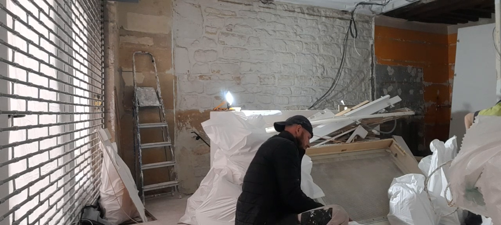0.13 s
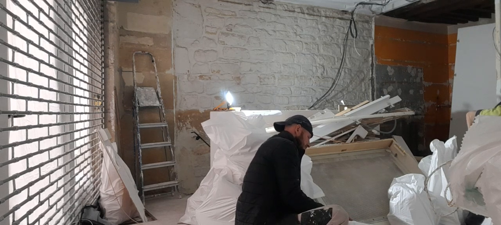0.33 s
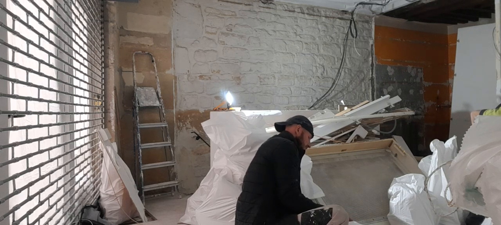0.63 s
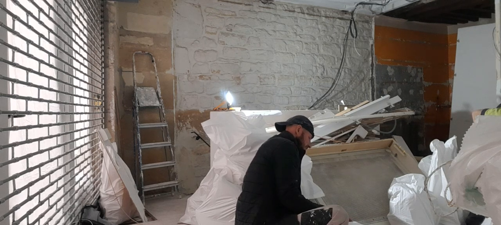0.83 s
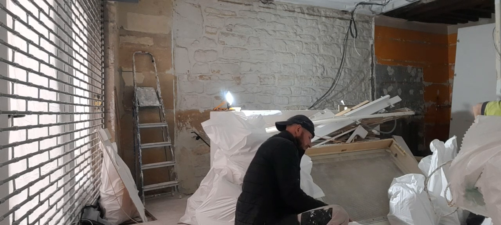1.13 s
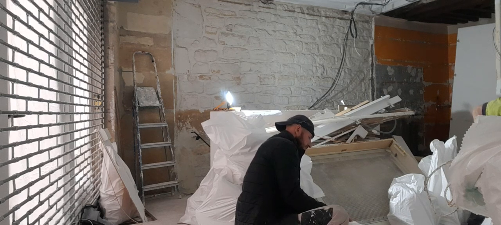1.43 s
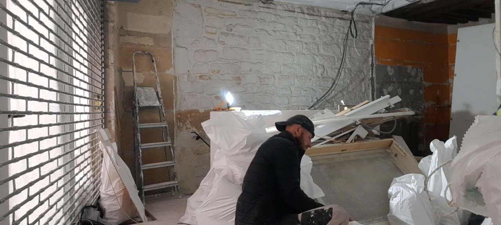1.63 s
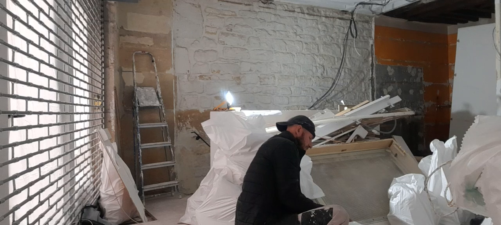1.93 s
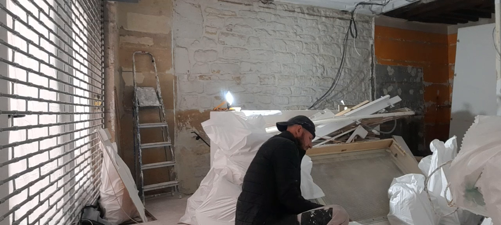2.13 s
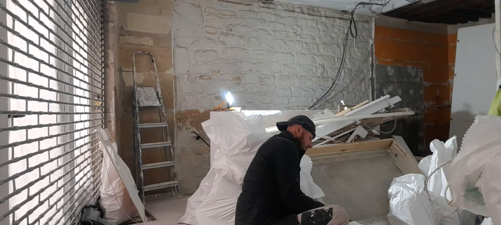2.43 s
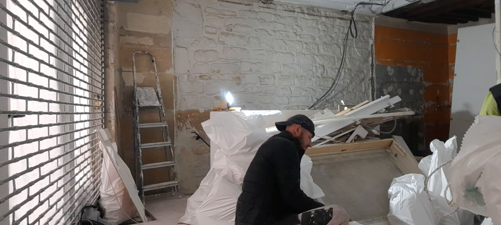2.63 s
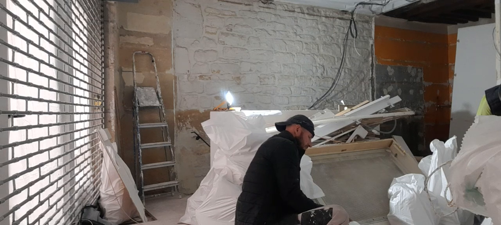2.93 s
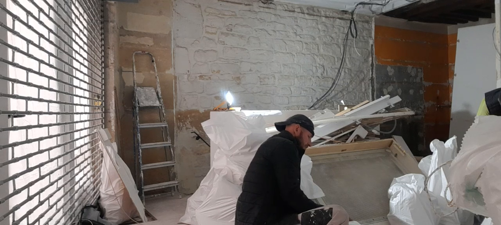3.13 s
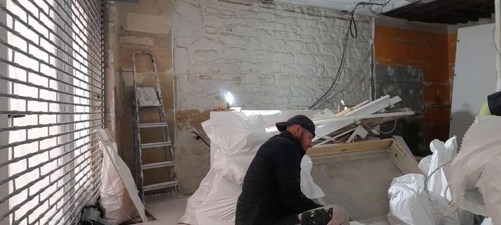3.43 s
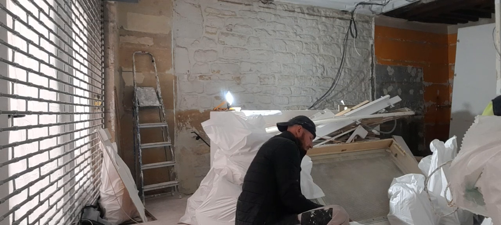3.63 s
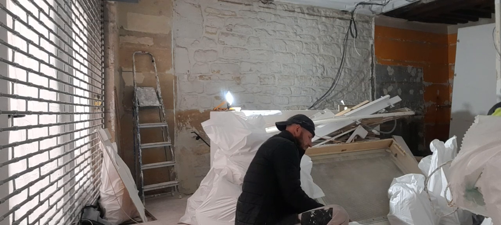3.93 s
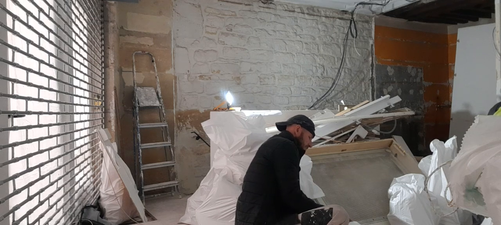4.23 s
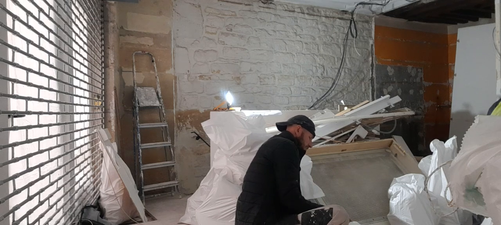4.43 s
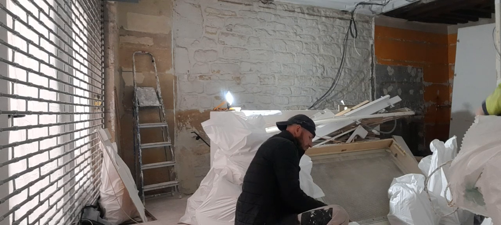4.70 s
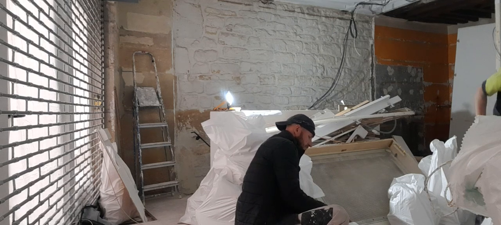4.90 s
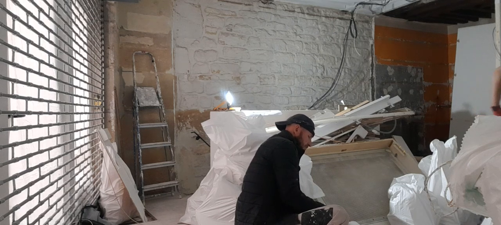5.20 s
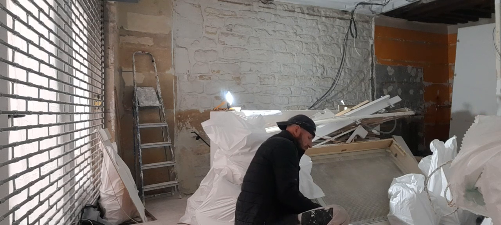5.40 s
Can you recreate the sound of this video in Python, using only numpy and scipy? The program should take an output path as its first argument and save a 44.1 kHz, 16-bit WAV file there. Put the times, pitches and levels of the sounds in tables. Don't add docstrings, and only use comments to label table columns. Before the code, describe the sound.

A bare old room with a quiet, low background and short, hard reverberation. At once a heavy load of broken brick lands, dull and loud, with overlapping thuds, sliding grit and a rapid clatter of small bright bits until about 0.3 s. A chip clicks at 0.4 s, and a tile-like shard lands with a bright clink and thud at 0.7 s. From 0.9 to 3.2 s it is much quieter: short gritty scrapes, crackling woven plastic, faint dust hiss, separate chip clicks, and a soft boomy bump near 2.2 s. Sharper clicks come around 3.05 and 3.14 s, then a hollow block drops at 3.35 s with a strong knock and brief ring. Soft scrapes, rustles and low bumps continue through 4.9 s. At 5.07 s four very quick blows strike a steel blade, with a thud and bright clang ringing towards the end at about 5.5 s. The close stereo microphone hears more treble on the right.

```python
import sys
import numpy as np
from scipy import signal
from scipy.fft import rfft, irfft, next_fast_len
from scipy.io import wavfile

SR = 44100
rng = np.random.default_rng(int(sys.argv[2]) if len(sys.argv) > 2 else 0)


def dump_mix(stems):
    frames = np.atleast_2d(stems).T
    limited = np.clip(frames, -1, 1)
    pcm = np.round(limited * 32767).astype(np.int16)
    wavfile.write(sys.argv[1], SR, pcm)


def invert_db(level):
    return 10 ** (np.asarray(level, dtype=float) / 20)


N = 245195


def unit(x):
    return x / np.sqrt(np.mean(np.mean(x, axis=0) ** 2) + 1e-20)


def along(points, hz):
    f, v = np.transpose(points)
    return np.interp(np.log(hz + 1), np.log(f + 1), v)


def filtered(x, response):
    m = next_fast_len(x.shape[-1] + 8192)
    spectrum = rfft(x, m) * response(np.fft.rfftfreq(m, 1 / SR))
    return irfft(spectrum, m)[..., :x.shape[-1]]


def add(out, s, x):
    k = round(s * SR)
    out[:, k:k + x.shape[1]] += x[:, :N - k]
    return out


# (frequency [Hz], correlation [-1 to 1])
ALIKE = [(30, 0.8), (60, 0.8), (130, 0.98), (290, 0.71), (640, 0.12), (1410, -0.13), (3100, 0.017),
         (6820, 0.012), (15000, 0.039)]


def two_ports(pair):
    def turn(hz):
        return np.arccos(np.clip(along(ALIKE, hz), -1, 1)) / 2
    mid, side = filtered(pair, lambda hz: np.array([np.cos(turn(hz)), np.sin(turn(hz))]))
    return np.array([mid + side, mid - side])


# (frequency [Hz], left minus right [dB])
PORTS = [(60, -4), (95, -4.5), (150, 0), (240, 0.5), (380, -4.5), (600, -3), (950, -5), (1500, -6.5),
         (2380, -6.5), (3770, -6), (5980, -13), (9470, 1.5), (15000, -6)]


def port_gain_db(hz):
    return along(PORTS, hz) * np.array([[.5], [-.5]])


def ports(x):
    return filtered(x, lambda hz: invert_db(port_gain_db(hz)))


# (frequency [Hz], t60 [s])
ROOM = [(100, 0.43), (500, 1), (2000, 0.62), (6000, 0.44), (12000, 0.15)]


def walls(x, shorten, onset_s):
    size = min(SR, round(shorten * 4 + 1) * SR // 4)
    hz, t, z = signal.stft(rng.standard_normal((2, size)), SR, nperseg=256)
    decay = invert_db(-60 * t / (shorten * along(ROOM, hz)[:, None]))
    tail = signal.istft(z * decay, SR, nperseg=256)[1][:, :size]
    tail = two_ports(tail * (1 - np.exp(-np.arange(size) / SR / onset_s)))
    return signal.fftconvolve(x[None], tail / np.linalg.norm(tail[0]), axes=1)[:, :len(x)]


def grains(colour, rate, spread_db, blur_s):
    contacts = (rng.random(N) < rate / SR) * invert_db(2 * spread_db * rng.exponential(size=N))
    energy = signal.lfilter([1], [1, -np.exp(-2 / (blur_s * SR))], contacts)
    pair = two_ports(np.sqrt(energy) * rng.standard_normal((2, N)))
    return unit(filtered(pair, lambda hz: invert_db(along(colour, hz) + port_gain_db(hz))))


def swells(rows, lift, quicker=1):
    s, db, swell_s, settle_s, *over_db = np.transpose(rows)[:, :, None]
    since = (np.arange(0, N + 32, 32) / SR - s) / quicker
    level_db = db + lift * sum(over_db) - 20 * np.maximum(-since / swell_s, since / settle_s)
    gain = np.sqrt(np.sum(invert_db(2 * level_db), axis=0))
    return np.interp(np.arange(N) / 32, np.arange(since.shape[1]), gain)


def follows(gain, level_db, grows):
    return invert_db(level_db) * (gain / invert_db(-60)) ** grows


def dipping(depth_db, recover_s):
    blows_s = np.array([[DROPS[1][0]], [DROPS[2][0]], [STRIKES[0][0]]])
    since = np.arange(N) / SR - blows_s
    dip_db = depth_db * (since > -.005) * np.exp(-(since / recover_s) ** 2)
    return invert_db(-np.sum(dip_db, axis=0))


def rattle(rise_s, t60):
    t = np.arange(SR) / SR
    return (1 - np.exp(-t / rise_s)) * invert_db(-60 * t / t60) * rng.standard_normal(SR)


def resonances(x, peaks, order=1):
    def response(f):
        total = 0
        for k, (c, w, db) in enumerate(peaks):
            peak = 1j * f * w / (c * c - f * f + 1j * f * w)
            total = total + (-1) ** k * invert_db(db) * peak ** order
        return total
    return filtered(x, response)


def ringing(modes, rise_s, behind):
    t = np.arange(SR // 2) / SR
    lag = np.array([[behind], [0]])
    ring = sum(invert_db(db - 60 * t / t60) * np.sin(2 * np.pi * (hz * t - lag)) for hz, db, t60 in modes)
    return ring * (1 - np.exp(-t / rise_s))


# (frequency [Hz], level [dB])
STILL = [(24, -45), (64, -5.5), (110, -17.5), (450, -16.5), (700, -29), (1200, -35), (2000, -24),
         (6200, -33.5), (8000, -36.5), (13000, -28), (15800, -27)]


def stillness():
    return invert_db(-67.5) * grains(STILL, rate=5500, spread_db=-1.5, blur_s=.03)


# (time [s], thud [dB], swell [s per 20 dB], settle [s per 20 dB], floor boom over thud [dB])
LOADS = [(0.0, -30, .02, .05, -17), (.066, -27, .03, .12, -8), (.14, -36, .08, .23, -.3),
         (.21, -34.5, .09, .07, -6), (.66, -64, .1, .04, -9), (.714, -37.5, .016, .15, -11),
         (.77, -33, .06, .14, -5), (1.41, -54, .06, .21, -16), (3.95, -64, .15, .21, -15),
         (1.85, -58, .06, .45, -5), (2.158, -46.5, .02, .24, .6), (2.55, -67, .21, .15, -3),
         (2.83, -60, .21, .21, -.3), (3.07, -64, .06, .4, -.3), (3.24, -61, .3, .15, -1.5),
         (3.375, -33, .03, .18, -7), (3.5, -49, .15, .24, 3), (4.16, -49.5, .14, .12, .3),
         (4.31, -55, .05, .15, -4), (4.52, -46, .06, .1, -.3), (4.69, -62, .15, .15, 4),
         (5.075, -39, .1, .21, -9), (5.14, -40, .1, .21, -6), (5.39, -58, .15, .21, -3)]
# (frequency [Hz], level [dB])
BOOM = [(53, -27), (90, -14), (151, 5), (194, -9.5), (230, 2), (300, -22.5), (510, -120)]
THUD = [(110, -57), (190, -7.5), (379, -3), (416, -2), (587, -3.5), (700, -11.5), (850, -13.5), (1100, -18),
        (1870, -120)]
# (frequency [Hz], width [Hz], level [dB])
FLOOR = [(233, 38, -14), (305, 75, 6), (348, 25, 2), (404.7, 7.3, -2), (469, 7.3, -3.5), (587, 20, -1.5)]


def heavy_loads():
    linger_db, linger_s = -25, .4
    tails = [(s, db + linger_db, swell_s, linger_s, over) for s, db, swell_s, settle_s, over in LOADS]
    loads = LOADS + tails

    def boards(f):
        return 1 + sum(invert_db(db - 8.5) / (1 + ((f - hz) / width * 2) ** 2) for hz, width, db in FLOOR)

    boom = swells(loads, 1) * grains(BOOM, rate=90, spread_db=2.5, blur_s=0.024)
    thud = unit(filtered(grains(THUD, rate=300, spread_db=1.72, blur_s=0.036), boards))
    return boom + swells(loads, 0) * dipping(5.3, 0.042) * thud


# (time [s], grit [dB], swell [s per 20 dB], settle [s per 20 dB],
# weave over grit [dB]) scrapes of the scooping and rustles of the sack
SCRAPES = [(0.012, -33, .08, .045, -6), (.088, -34, .05, .21, -8.5), (.39, -57, .15, .21, -1.5),
           (.67, -63, .3, .05, 3), (.858, -53, .1, .07, -1.5), (.942, -60, .05, .19, .3),
           (1.422, -49.5, .11, .16, -3), (1.606, -57, .011, .15, 4), (1.88, -61, .35, .9, 5),
           (2.238, -55, .6, .16, -6), (2.42, -66, .05, .21, -6), (2.66, -69, .05, .21, 8),
           (2.808, -64, .4, .35, 4), (3.042, -54, .03, .33, -4), (3.282, -55.5, .14, .12, 3),
           (3.5, -58, .3, .3, 4), (3.638, -53, .3, .21, -5), (4.068, -61, .12, .3, 3),
           (4.29, -53, .03, .3, -4), (4.488, -54, .04, .21, -7), (4.808, -66, .4, .35, 5),
           (4.996, -62, .15, .3, 4), (5.35, -57, .45, .45, -1.5),
           (1.28, -72, .05, .11, 7), (3.91, -78, .21, .25, 11), (4.178, -69, .11, .15, 8),
           (4.68, -61, .09, .15, -.3)]
SPRAYS = [
    (.716, -38, .021, .21, -7),
    (3.355, -44, .008, .11, 3),
    (.18, -39, .3, .13, -6),
    (5.081, -36, .015, .12, 11),
]
# (frequency [Hz], level [dB])
GRIT = [(410, 0), (700, -1.5), (752, -0.5), (1050, -8.5), (1470, -2), (1770, -4.5), (1940, -2.5),
        (3300, -15.5), (4290, -22), (7260, -120)]
WEAVE = [(1530, -10), (2600, -2), (2810, -4), (4080, -4.5), (6210, -3), (6640, -1.5), (7590, -37),
         (8200, -20.5), (10700, -17), (18000, -120)]
DUST = [(4240, -8), (7200, -4), (8080, -11.5), (11900, -0.5), (15100, -4), (15800, -25)]


def sliding_grit():
    slides = SCRAPES + SPRAYS
    dusty = slides[:-2]
    grit = swells(slides, 0) * grains(GRIT, rate=400, spread_db=1.5, blur_s=0.033)
    rustle = grains(WEAVE, rate=830, spread_db=2.0, blur_s=0.018)
    sheen = filtered(rustle, lambda hz: hz > 7800)
    weave = swells(slides, 1) * (rustle - sheen) + swells(dusty, 1) * sheen
    stir = swells(dusty, 1, quicker=.82)
    stir = stir / np.hypot(1, stir / invert_db(-53))
    dust = follows(stir, level_db=-61.5, grows=1.1) * dipping(np.array([[3], [0], [11]]), .13)
    dust = dust * grains(DUST, rate=1300, spread_db=2.0, blur_s=0.014)
    return (grit + weave + dust) * dipping(np.array([[7], [4], [7]]), .1)


# (time [s], peak [dB], time to settle [s], first slam [dB])
DROPS = [
    (0.054, -22, 0.39, 25),
    (0.701, -26, 0.14, 10),
    (3.349, -24, 0.0636, 20),
    (.075, -31, .5, 10),
]
# (frequency [Hz], width [Hz], level [dB])
LUMPS = [
    [(420, 84, 5.5), (1550, 74, -6), (2080, 180, -9), (2780, 220, -7.5)],
    [(576, 100, 4.5), (1450, 180, 2), (1900, 120, -1), (2430, 130, -6), (3530, 250, -10), (4640, 200, -12),
     (5900, 250, -12), (6280, 200, -10), (9000, 220, -20), (9530, 200, -18), (11500, 190, -21),
     (12100, 410, -24), (14700, 1200, -18)],
    [(300, 80, 0), (440, 90, 2), (581, 59, -6.5), (790, 21, -5), (1105, 15, -10), (1250, 30, -2.5),
     (1607, 45, -14), (1990, 30, -4.5), (2206, 60, -18), (2790, 52, -22)],
    [(4700, 400, 0), (5250, 350, -1), (6600, 300, -5)],
]
# (time [s], level [dB], rise [s], left port behind [cycles])
CLINKS = [
    (.701, -41, .008, .2),
    (3.3505, -24.5, .002, .08),
    (3.326, -42, .003, .08),
    (.053, -29, .004, .05),
]
# (frequency [Hz], level [dB], t60 [s])
CLINK_MODES = [
    [(1447, 5, .12), (2439, -3, .2), (3531, -3, .18), (4635, -5, .16), (5868, -12, .2), (6240, 0, .22),
     (7472, -17, .2), (9545, -7, .11), (11500, -11, .1), (14170, -14, .15), (14800, -11, .12)],
    [(409, 0, .41), (474, -2, .55), (576, -13, .8), (770, -19, .32), (1105, -20, .25), (1233, -10, .2),
     (1981, -17, .23), (2089, -28, .3), (2762, -24, .16), (4334, -32, .2), (4750, -32, .2),
     (5766, -32, .15)],
    [(580, 0, .15)],
    [(390, 0, .12), (560, -5, .1)],
]


def bricks():
    out = np.zeros((2, N))
    for (s, db, settle_s, slam_db), peaks in zip(DROPS, LUMPS):
        landing = invert_db(slam_db) * (np.arange(SR) == SR // 441)
        x = resonances(landing + rattle(rise_s=0.0045, t60=settle_s), peaks)
        x = x / np.abs(x).max()
        add(out, s - .003, invert_db(db - 5.5) * (x + invert_db(6) * walls(x, shorten=0.54, onset_s=0.0053)))
    for (s, db, rise_s, behind), modes in zip(CLINKS, CLINK_MODES):
        add(out, s, invert_db(db) * ringing(modes, rise_s, behind))
    return out


# (time [s], peak [dB], chip pitch [Hz], low knock [dB], bright edge [dB])
CHIPS = [(0.056, -27, 2840, -11, -38), (.0733, -28, 5000, -15, -20), (.092, -27, 4800, -12, -25),
         (.0995, -28, 5200, -15, -25), (.1251, -25, 5200, -18, -25), (.138, -31, 4600, -15, -25),
         (.152, -33, 4900, -15, -25), (.17, -33, 2200, -8, -25), (0.3765, -32, 1980, -8.5, -22),
         (0.6526, -38.5, 3820, -13, -9), (0.696, -41, 900, 8, -30), (0.9378, -45, 4050, -17, -21),
         (1.2133, -37, 2820, -19, -30), (1.3747, -39, 964, -6, -15), (1.5982, -42, 6000, -3, 1),
         (1.736, -41, 4660, -33, -11), (1.8342, -36, 2790, -9, -24), (2.1625, -41, 1680, -6, -20),
         (2.4077, -47, 1900, -0.5, -31), (2.7692, -39, 1540, -13, -19), (2.811, -38, 1520, -1.5, -28),
         (3.016, -44, 1890, -7, -9), (3.045, -33, 972, -7, -15), (3.1394, -30.5, 1080, -17.5, -16.5),
         (3.275, -41, 2060, -13, -15), (3.326, -44, 560, 0, -25), (3.347, -40, 700, 6, -30),
         (3.3535, -38, 4500, -12, -15), (3.8157, -52, 2000, -10, -0.5), (4.0112, -49, 3730, -16, -5),
         (4.0642, -41, 2100, -16, -7), (4.2637, -38, 1390, -4, -23), (4.482, -42, 1200, -4, -20),
         (4.9791, -42, 964, -7, -10)]
# (frequency [Hz], level [dB])
SNAP = [(410, -23), (700, -1), (1330, -4), (2130, 3), (3910, -6), (4450, 0), (7920, -16.5), (9000, -18),
        (11700, -54), (19800, -120)]


def chips():
    out = np.zeros((2, N))
    for s, db, hz, knock_db, edge_db in CHIPS:
        def body(f):
            knock = np.interp(f, [2200, 3000], [knock_db + 9.5, 0])
            ring = 1 + 2.2 / (1 + ((f / hz - 1) / 0.16) ** 2)
            return invert_db(along(SNAP, f) + knock) * ring

        click = rattle(rise_s=0.0007, t60=0.009)[:SR // 3]
        edge = filtered(click, lambda f: invert_db(along(DUST, f) + edge_db + 10.5))
        x = filtered(click, body) + edge
        add(out, s, invert_db(db - 3.5) * (x + invert_db(-1) * walls(x, shorten=0.22, onset_s=0.0027)))
    return out


# (time [s], rumble [dB], swell [s per 20 dB], settle [s per 20 dB])
JOLTS = [(.25, -59, .3, .6), (.64, -60, .21, .11), (.77, -53, .11, .3), (1.41, -66, .11, .15),
         (1.65, -63, .11, .3), (2.19, -54, .09, .6), (2.35, -56, .3, .06), (2.57, -65, .11, .11),
         (2.83, -62, .3, .15), (3.22, -60, .25, .12), (3.39, -48, .06, .4), (4.21, -63, .25, .4),
         (4.56, -55, .09, .08), (4.7, -64, .15, .11), (5.14, -60, .3, .6)]
# (frequency [Hz], level [dB])
RUMBLE = [(15, -45), (25, -35), (55, -6.5), (105, -9), (140, -34), (230, -120)]


def jolts():
    return swells(JOLTS, 0) * grains(RUMBLE, rate=200, spread_db=0.0, blur_s=0.026)


# (time [s], level [dB])
STRIKES = [
    (5.068, -28),
    (5.077, -30),
    (5.084, -25),
    (5.103, -24),
]
# (frequency [Hz], level [dB])
CRACK = [(530, -46), (900, -23), (1620, -34), (2430, 13), (3090, -15), (3930, 7), (4280, -13), (4760, -12),
         (6270, 7), (8170, -32), (8880, -20), (11000, -29), (15800, -23.5)]
# (blow [dB], its t60 [s], later swell [dB], swell half-width [s])
RINGS = [(-45, .88, -39.5, .07), (-43, .11, -43, .03), (-38, .47, -47, .06), (-42, .42, -45, .045)]
# (frequency [Hz], ..)
PARTIALS = [(2743,), (3706,), (4809, 4851), (6099,)]
# (frequency [Hz], level [dB], t60 [s])
WEAK = [(1900, -20, .2), (2538, -13, .45), (3311, -17, .25), (3906, -13, .15), (5459, -19, .3)]
# (frequency [Hz], width [Hz], level [dB])
OVERTONES = [(6440, 150, -2), (7450, 200, -5), (8380, 70, -10), (9080, 130, -6), (9800, 70, -16),
             (10500, 120, -6), (11580, 100, -10), (12130, 70, -14), (12600, 80, -14), (12790, 80, -15),
             (13750, 300, -12), (14400, 600, -9), (15450, 300, -12)]
# (frequency [Hz], level [dB], t60 [s])
SHIMMER = [(6880, -28, .5), (7381, -19, .5), (7493, -21, .4), (7779, -27, .4), (8387, -26, .31),
           (9135, -17, .28), (9469, -25, .25), (10540, -17, .33), (11630, -24, .4), (12130, -29, .4),
           (12600, -31, .35), (12790, -30, .35), (13780, -26, .2), (15585, -25, .26)]


def blade():
    t = np.arange(SR // 2) / SR
    first_s, second_s = STRIKES[0][0], STRIKES[1][0]
    long = 0
    for (blow_db, t60, swell_db, width_s), pitches in zip(RINGS, PARTIALS):
        swell = invert_db(swell_db - 6 * ((t - .095) / width_s) ** 2)
        gain = np.hypot(invert_db(blow_db - 60 * t / t60), swell) * (1 - np.exp(-t / .012))
        for hz, share in zip(pitches, [.9, .55]):
            tone = np.sin(2 * np.pi * (hz * t + np.array([[0], [.2]])))
            long = long + gain * invert_db(6.5) * share * tone
    ring = add(np.zeros((2, N)), first_s, long)

    short = 0
    for hz, level, t60 in WEAK:
        short = short + invert_db(level - 60 * t / t60) * np.sin(2 * np.pi * (hz * t + rng.random((2, 1))))
    add(ring, first_s, invert_db(-28) * short * (1 - np.exp(-t / 0.007)))

    clang = [resonances(rattle(rise_s=0.0054, t60=0.29), OVERTONES, order=2) for port in range(2)]
    add(ring, first_s, invert_db(-17) * np.array(clang))
    add(ring, second_s, invert_db(-28) * ringing(SHIMMER, rise_s=.006, behind=.2))
    for s, db in STRIKES:
        burst = filtered(rattle(rise_s=0.0025, t60=0.022), lambda hz: invert_db(along(CRACK, hz) + db + 8.5))
        add(ring, s, burst + invert_db(-7) * walls(burst, shorten=0.98, onset_s=.005))
    return ring


def scene():
    rubble = heavy_loads() + sliding_grit() + jolts()
    return stillness() + rubble + ports(bricks() + chips() + blade())


def top_cut(x):
    return signal.sosfilt(signal.butter(12, 15940, fs=SR, output="sos"), x)


def record(dry):
    mix = filtered(dry, lambda hz: (hz < 15800) / np.sqrt(1 + (42 / (hz + 1)) ** 6))
    return top_cut(mix)


dry = scene()
out = record(dry)
dump_mix(out)
```